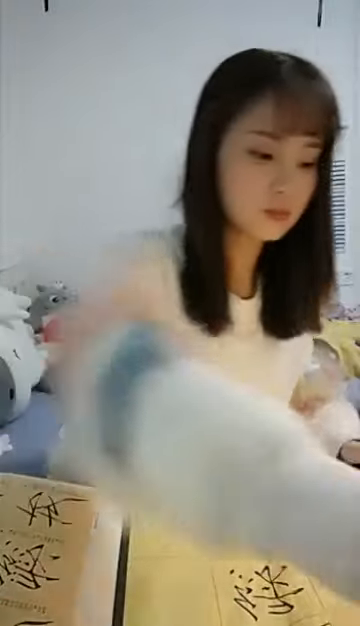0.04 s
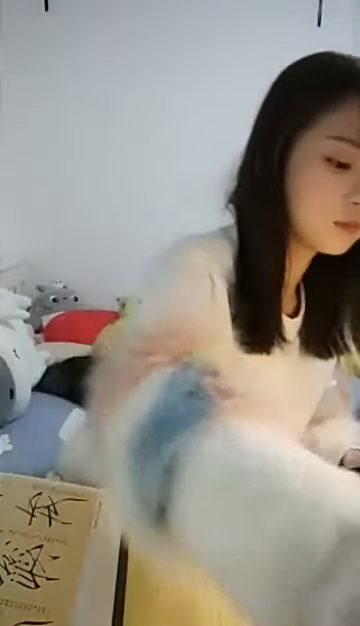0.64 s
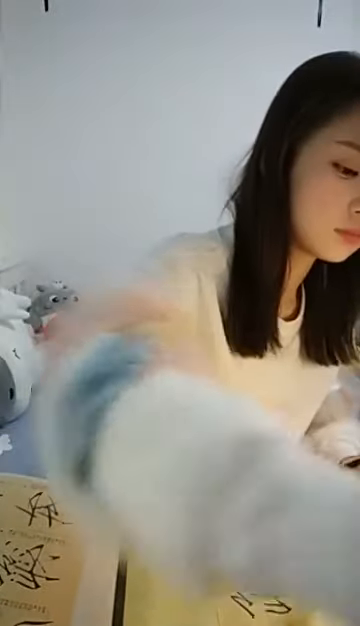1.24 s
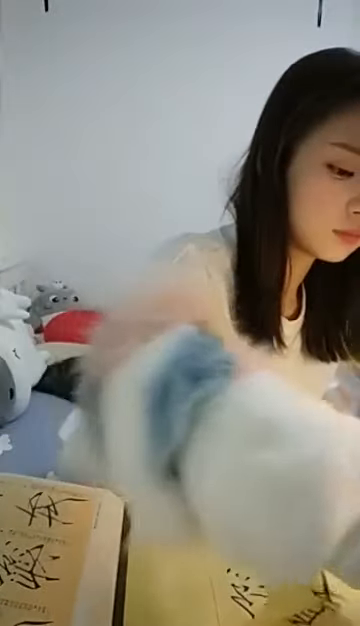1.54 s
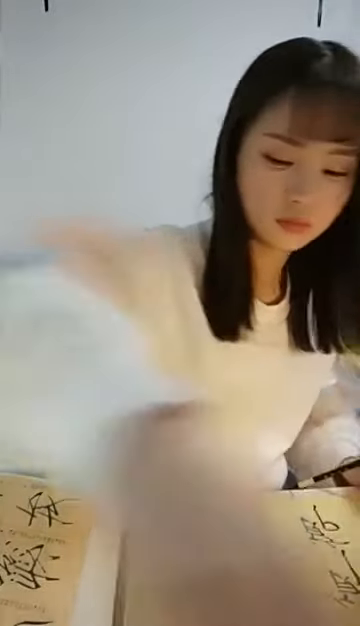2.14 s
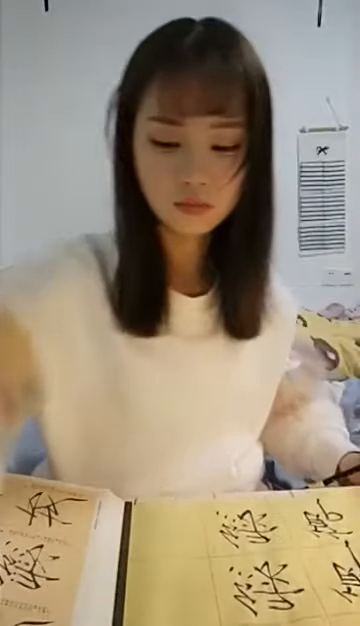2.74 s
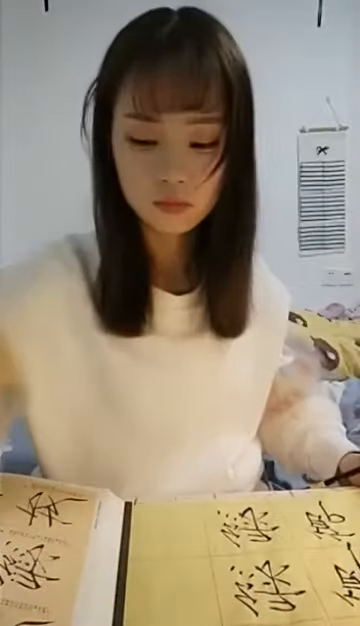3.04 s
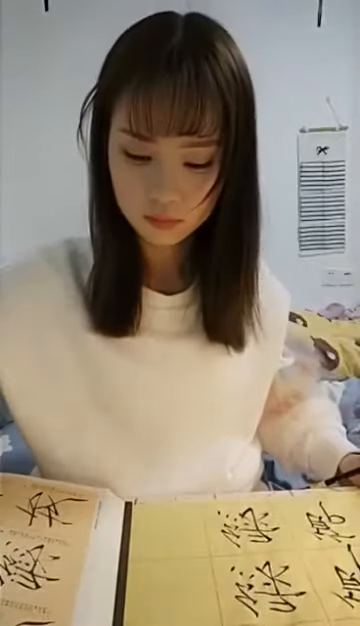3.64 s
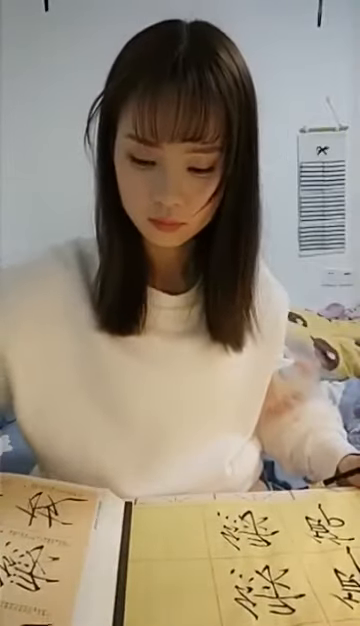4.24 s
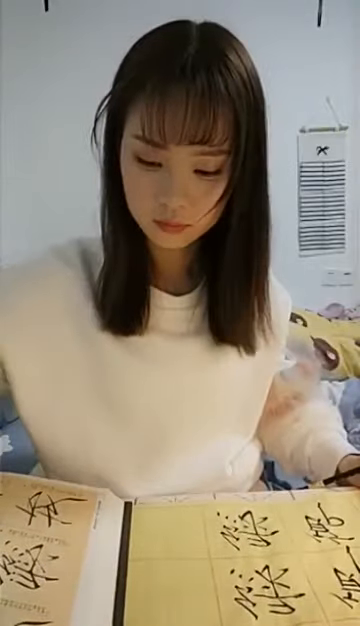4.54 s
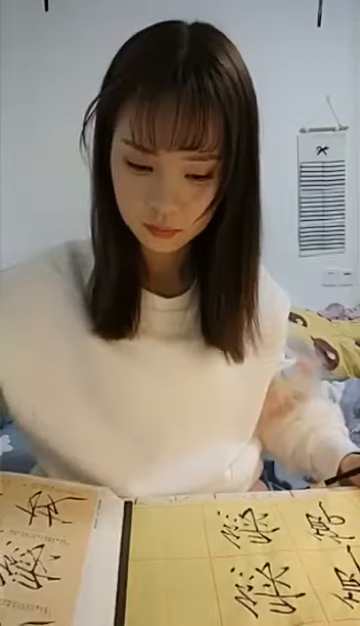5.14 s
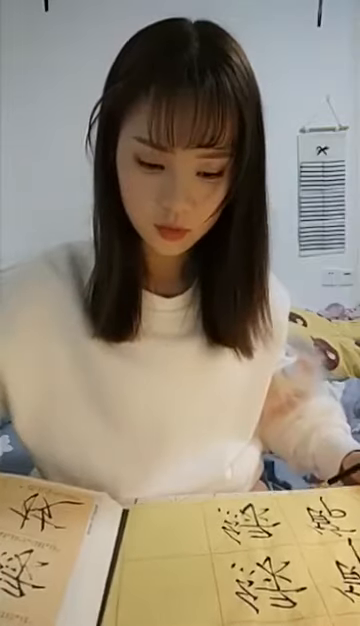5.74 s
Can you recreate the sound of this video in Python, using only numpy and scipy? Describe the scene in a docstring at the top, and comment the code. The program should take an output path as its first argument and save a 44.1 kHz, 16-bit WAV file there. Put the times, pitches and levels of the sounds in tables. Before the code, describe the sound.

A sheet of paper rustles and crackles close by as it is moved, then fingers softly stroke a page.

```python
"""A small quiet room, a phone microphone close to a paper practice book on a table.
A thin sheet is dragged, shifted and laid flat: it buckles in short snaps, each a burst of tiny
fibre cracks, crinkles as it slides and now and then pats the pages below. Later, fingers stroke
the page softly. Under it lie the low murmur of the room's air, a faint hum and a thin hiss."""
import sys
import numpy as np
from scipy import signal
from scipy.fft import rfft, irfft, next_fast_len
from scipy.io import wavfile
from scipy.ndimage import uniform_filter1d

SR = 44100
rng = np.random.default_rng(int(sys.argv[2]) if len(sys.argv) > 2 else 0)


def wav_out(sig):
    """Save sig, one row per channel (or a flat mono array), as 16-bit PCM at SR to the path in sys.argv[1]."""
    wavfile.write(sys.argv[1], SR, np.round(np.clip(np.atleast_2d(sig).T, -1, 1) * 32767).astype(np.int16))


N = 254898
TIME = np.arange(N) / SR

# the sheet's clear buckles: (time [s], level [dB], rise [s], body lift [dB], edge fizz lift [dB])
BUCKLES = [(0.2336, -59.5, 0.015, 5.5, 2), (0.4936, -54.5, 0.0081, 2, -1), (0.5446, -52, .0064, -5, 11),
           (0.5701, -36, 0.0032, -2, 5), (0.5987, -31, 0.0083, 0, 8.5), (0.633, -39.5, 0.0031, 1, 1),
           (0.6637, -47.5, 0.014, 6, -3), (0.7226, -38, 0.0069, 1, -1), (0.7402, -33.5, 0.0058, -7, 3),
           (0.762, -38.5, 0.0086, 4, -14), (0.801, -36, 0.0041, -5, -4), (0.842, -43, .008, 9, 10),
           (0.9034, -28.5, 0.0048, -5.5, 5), (1.008, -30, 0.0052, -4, 0), (1.05, -34.5, 0.004, -23, 7),
           (1.0674, -36, 0.0067, -10, 4), (1.101, -32, 0.0038, 4.5, 2), (1.106, -29, 0.0069, -9, 6.5),
           (1.117, -26.5, 0.0052, -9, 9), (1.1305, -27.5, 0.0089, -13.5, 0), (1.1583, -26, 0.0043, -8, 12),
           (1.1733, -37, 0.011, -24, 6), (1.214, -33.5, 0.0095, 0, 4), (1.3182, -50.5, 0.0057, 8, 4),
           (1.3998, -40.5, 0.0025, 1, 11.5), (1.4117, -46, 0.0078, 13, 9), (1.453, -31, 0.0039, -4, 13.5),
           (1.4608, -45.5, .008, 2, 7), (1.5501, -37.5, 0.0051, -23, 12), (1.5627, -39, 0.0095, -10, -14),
           (1.62, -46, 0.0043, 16, 6), (1.85, -56, 0.0031, 8, 4), (1.8805, -53, 0.0068, 17, -2),
           (1.9964, -60.5, 0.0089, 27, 5), (2.087, -55, 0.0064, 7, 2), (2.1603, -40, 0.0034, -6, 5),
           (2.185, -48, 0.0095, 1.5, 13), (2.2373, -51.5, 0.0053, 9, -6), (2.341, -54, 0.0032, 10, -12),
           (2.3782, -52, 0.005, -2, -17), (2.409, -38, 0.0052, -6.5, 2), (2.4838, -41.5, 0.0036, 0, 3),
           (2.504, -41.5, .007, 2.5, 3), (2.5381, -31, 0.0036, -9, 6), (2.5676, -33.5, .0044, -10, 8.5),
           (2.609, -38.5, 0.0057, -6.5, -8), (2.663, -49, 0.0056, -1, -7), (2.7013, -36.5, 0.0038, -1, 6),
           (2.7068, -32.5, 0.0074, -10, 5), (2.755, -41.5, 0.0056, 0, 0), (2.7731, -30, 0.0037, -10.5, -3),
           (2.7937, -33, .0032, -11, -3), (2.8212, -32, 0.0054, -3.5, 1), (2.85, -46.5, 0.0072, -1, -8),
           (2.8942, -48, 0.0094, 5, 8), (2.955, -43, .0034, -3, 8), (2.9717, -38.5, 0.0053, 2.5, -16),
           (3.072, -42, 0.0055, 6, 5), (3.1553, -40, 0.0025, -4, -19), (3.23, -45.5, 0.0041, 0.5, 3),
           (3.327, -46.5, 0.0047, -4, 5.5), (4.409, -51.5, 0.0067, 8, 15.5),
           (5.473, -50.5, 0.0078, -13, -1), (5.6437, -45, 0.0054, -1, -11), (5.6891, -47, .0055, -1, 8),
           (5.711, -46, .012, -3, 17), (5.744, -48.5, .0066, -6, -2)]
# spectrum of bending paper: (frequency [Hz], level [dB])
FLEX_SPECTRUM = [(40, -22), (130, -28), (280, -2), (750, -1.5), (1100, -1.5), (1700, 1.5), (3000, 2),
                 (4500, 0.5), (6000, 0), (9000, -11)]


def gain_of(db):
    """Decibels to gain."""
    return 10 ** (np.asarray(db) / 20)


def unit_rms(x):
    """Scales to rms 1."""
    return x / np.sqrt(np.mean(x ** 2) + 1e-20)


def at_frequency(points, hz):
    """Reads a table on a log-frequency axis."""
    frequency, value = np.transpose(points)
    return np.interp(np.log(hz + 1), np.log(frequency + 1), value)


def add(mix, start_s, sound):
    """Adds a sound into the mix at start_s."""
    part = mix[max(round(start_s * SR), 0):][:len(sound)]
    part += sound[:len(part)]


def ring(x, spectrum, lift_db=lambda hz: 0, size=2048):
    """Colours x with a minimum-phase filter, so that clicks stay sharp."""
    hz = abs(np.fft.fftfreq(size, 1 / SR))
    log_gain = np.log(gain_of(at_frequency(spectrum, hz) + lift_db(hz)))
    response = np.exp(np.conj(signal.hilbert(log_gain)))
    return signal.oaconvolve(x, np.fft.ifft(response).real[:size // 2])


def wander(per_s):
    """A smooth random curve of rms 1 that changes about per_s times a second."""
    size = next_fast_len(N)
    hz = np.fft.rfftfreq(size, 1 / SR)
    slow = rfft(rng.standard_normal(size)) / (1 + (hz / per_s) ** 4)
    return unit_rms(irfft(slow, size)[:N])


def clumping(depth_db, per_s):
    """A flickering gain that gathers an even grain into clumps."""
    return unit_rms(gain_of(depth_db * wander(per_s)))


def room_tone(hiss_db=-73):
    """The air murmurs and hums, growing a little louder overall, under a thin steady hiss."""
    # spectra of the murmur and the hiss: (frequency [Hz], level [dB])
    murmur_spectrum = [(30, -32), (70, -31.5), (105, -20.5), (135, -13.5), (165, -4.5), (210, 2.5),
                       (280, -1.5), (340, 2.5), (430, -3.5), (510, 0), (620, -5), (900, -7), (1400, -16),
                       (3000, -25.5), (8000, -44)]
    hiss_spectrum = [(1000, -8.5), (3000, -5), (6500, -7), (9500, 2), (11000, -1), (13000, -4.5),
                     (15600, -7)]
    # faint wavering hums: (frequency [Hz], relative level [dB])
    hums = [(214, -10.5), (548, -19.5)]
    # slow swell of murmur and hums together: (time [s], level [dB])
    air_level = [(0.0, -71.5), (1.4, -69), (1.68, -65), (2.2, -70), (2.8, -67.5), (4.7, -66.5), (5.78, -65)]
    murmur = unit_rms(ring(rng.standard_normal(N), murmur_spectrum, size=8192)[:N])
    hum = np.zeros(N)
    for hz, db in hums:
        waver = wander(per_s=13) + 1j * wander(per_s=6.5)
        hum += gain_of(db) * unit_rms((waver * np.exp(2j * np.pi * hz * TIME)).real)
    hiss = unit_rms(ring(rng.standard_normal(N), hiss_spectrum)[:N])
    swell = gain_of(np.interp(TIME, *np.transpose(air_level)))
    return swell * (gain_of(-1) * murmur + hum) + gain_of(hiss_db) * hiss


def small_room(x, wet_db=-15, echoes_per_s=3000, gap_s=0.005):
    """This close, the walls add only a short, weak tail of reflections; the treble dies first."""
    # reverberation of the room: (frequency [Hz], time to fall 60 dB [s])
    room_t60 = [(200, 0.16), (1500, 0.15), (5000, 0.097), (15000, 0.022)]
    echoes = rng.choice([-1., 1.], SR // 2) * (rng.random(SR // 2) < echoes_per_s / SR)
    echoes[:round(gap_s * SR)] = 0
    hz, t, bands = signal.stft(echoes, SR, nperseg=256)
    decay = gain_of(-60 * t / at_frequency(room_t60, hz)[:, None])
    tail = signal.istft(bands * decay, SR, nperseg=256)[1]
    return x + gain_of(wet_db) * signal.fftconvolve(x, tail / np.linalg.norm(tail))[:N]


def page_pats(step_octaves=0.67, attack_s=0.00021):
    """The page lands on those below: a dull, quickly fading puff in one broad resonance."""
    # soft landings: (time [s], level [dB], resonance [Hz], decay time [s])
    pats = [(1.094, -47, 1760, .015), (1.883, -60.5, 1670, 0.023), (3.076, -46.5, 1570, 0.008),
            (5.137, -60, 860, 0.024)]
    out, t = np.zeros(N), np.arange(SR // 8) / SR
    for start, db, hz, decay_s in pats:
        resonance = [(hz * 2 ** (k * step_octaves), -7 * abs(k) ** 1.5) for k in range(-3, 4)]
        puff = unit_rms(ring(rng.standard_normal(len(t)), resonance)[:len(t)])
        envelope = np.exp(-t / decay_s) * (1 - np.exp(-t / attack_s))
        add(out, start, gain_of(db) * envelope * puff)
    return out


def fibre_cracks(per_s, spread_db):
    """Paper fibres give way in a random train of clicks: mostly small, a few large."""
    cracked = rng.random(N) < per_s / SR
    size = np.minimum(rng.exponential(1, N), 5)
    sign = rng.choice([-1, 1], N)
    return unit_rms(cracked * sign * gain_of(spread_db * size))


def crinkle(spectrum, per_s, spread_db, ripple_db, strain_db, patches=8, strain_step_s=0.012):
    """Patches of the sheet crack as strain moves among them, each with its own uneven resonances."""
    grid_hz, out = np.linspace(0, SR / 2, num=70), np.zeros(N)
    ripples = ripple_db * rng.standard_normal((patches, len(grid_hz)))
    ripples -= 10 * np.log10(np.mean(gain_of(ripples) ** 2, axis=0))  # together they even out
    cracks = fibre_cracks(per_s, spread_db)
    patch_of_crack = rng.integers(0, patches, N)
    moments = np.arange(0, N / SR + strain_step_s, strain_step_s)
    for patch, ripple in enumerate(ripples):
        strain = gain_of(strain_db * np.interp(TIME, moments, rng.standard_normal(len(moments))))
        own_cracks = cracks * (patch_of_crack == patch) * strain
        out += ring(own_cracks, spectrum, lambda hz: np.interp(hz, grid_hz, ripple))[:N]
    return unit_rms(out)


def finger_strokes(attack_s=0.018, release_s=0.012):
    """Skin rubs paper with a fine, bright grain; each stroke lands, swells or eases, and lifts off."""
    # strokes on the page: (start [s], length [s], level [dB], swell [dB], flex offset [dB])
    strokes = [(4.178, 0.033, -71, -4, -11), (4.247, 0.22, -64, 6, -12.5), (4.527, 0.026, -68.5, -0.5, -16),
               (4.758, 0.06, -67.5, -2, -12), (4.83, 0.017, -58.5, -2, -22), (5.115, 0.028, -61.5, 8, -8),
               (5.157, 0.21, -68, -9, -6), (5.362, 0.094, -53, -8, -17), (5.468, 0.074, -46.5, -14.5, -10),
               (5.543, 0.088, -58, 6.5, -13.5), (5.633, 0.14, -51.5, 1.5, -8)]
    # spectrum of skin on paper: (frequency [Hz], level [dB])
    skin_spectrum = [(2000, -46), (5000, -27), (6800, -3.5), (9200, 4.5), (11500, 5.5), (13500, 0.5),
                     (15600, 0.5)]
    clumps = clumping(depth_db=1, per_s=200)
    friction = crinkle(skin_spectrum, per_s=27000, spread_db=4, ripple_db=4, strain_db=-1.5)
    flex = crinkle(FLEX_SPECTRUM, per_s=12000, spread_db=3.5, ripple_db=0.5, strain_db=2.5)
    out = np.zeros(N)
    for start, length, db, swell_db, flex_db in strokes:
        t = TIME - start
        contact = np.clip(t / attack_s, 0, 1) * np.exp(-np.maximum(t - length, 0) / release_s)
        effort = gain_of(db + swell_db * np.clip(t / length, 0, 1))
        out += contact * effort * (gain_of(2) * friction + gain_of(flex_db) * flex)
    return clumps * out


def sheet_motion():
    """How fast the sheet slides, as a gain on its friction; silent before and after the handling."""
    # dragged across the book, shifted once more, laid down and pressed flat: (time [s], level [dB])
    drag = [(0.46, -71), (0.6, -47.5), (0.7, -48.5), (0.77, -46), (0.89, -48.5), (1.07, -43.5), (1.15, -41),
            (1.21, -43), (1.32, -64)]
    shift = [(1.44, -57.5), (1.5, -51.5), (1.59, -52.5), (1.65, -68.5), (1.71, -67.5), (2.06, -74.5),
             (2.23, -64), (2.3, -79)]
    lay_down = [(2.41, -62.5), (2.47, -81), (2.58, -51), (2.66, -65.5), (2.78, -59), (3.1, -62),
                (3.22, -75), (3.4, -67), (3.55, -88)]
    db = np.interp(TIME, *np.transpose(drag + shift + lay_down), left=-120, right=-120)
    return uniform_filter1d(gain_of(db), size=300)


def sheet_settling(offset_db=-18.5, fade_db_per_s=227):
    """Gain of the rustle as the sheet settles after each clear buckle."""
    power, t = np.zeros(N), np.arange(SR // 2) / SR
    for start, db, rise_s, _, _ in BUCKLES:
        add(power, start + rise_s, gain_of(db + offset_db - fade_db_per_s * t) ** 2)
    return np.sqrt(power)


def sheet_sliding(friction_db=-1, flex_db=-5, flex_limit_db=-50.5):
    """Dense cracks in clumps: the same catches make the sheet hiss and flex as it moves and settles."""
    # spectrum of paper sliding on paper: (frequency [Hz], level [dB])
    friction_spectrum = [(1500, -30.5), (4000, -15), (5900, -5.5), (6900, -3), (9000, 3.5), (11200, 1.5),
                         (12700, -3.5), (15600, -8.5)]
    clumps = clumping(depth_db=1.73, per_s=92)
    friction = crinkle(friction_spectrum, per_s=20000, spread_db=2.5, ripple_db=2, strain_db=5.5)
    flex = crinkle(FLEX_SPECTRUM, per_s=10000, spread_db=2.5, ripple_db=6, strain_db=3.5)
    flex *= clumping(depth_db=1, per_s=63)
    moving = np.hypot(sheet_motion(), sheet_settling())
    bending = gain_of(flex_db) * moving
    bending /= np.hypot(1, bending / gain_of(flex_limit_db))  # the sheet can bend only so far
    return clumps * (gain_of(friction_db) * moving * friction + bending * flex)


def stray_buckles(count=30, from_s=0.55, to_s=3.8, spread_db=3, rise_s=0.0023, body_db=4, fizz_db=0):
    """Rows like BUCKLES for small ticks at random moments, stronger when the sheet moves faster."""
    when, strength = rng.random((count, 2)).T
    times = from_s + when * (to_s - from_s)
    motion_db = 20 * np.log10(np.interp(times, TIME, sheet_motion()))
    levels = motion_db + 1.5 + spread_db * (2 * strength - 1)
    return [(start, db, rise_s, body_db, fizz_db) for start, db in zip(times, levels)]


def sheet_snaps(buckles, ripple_db=3, pop=3.3, body_hz=3200, crease_hz=5200, edge_hz=12200):
    """Each buckle is an avalanche of cracks that swells to one sharp pop, ringing its own patch."""
    out, cracks = np.zeros(N), fibre_cracks(per_s=14000, spread_db=3)
    grid_hz = np.linspace(0, SR / 2, num=44)
    ripples = ripple_db * rng.standard_normal((len(buckles), len(grid_hz)))
    for (start, db, rise_s, body_db, fizz_db), ripple in zip(buckles, ripples):
        peak = max(round(rise_s * SR), 20)
        age = np.arange(5 * peak) / peak  # in rise times
        swell = (age * np.exp(1 - age)) ** 3
        avalanche = swell * cracks.take(int(start * SR) + np.arange(len(age)), mode="wrap")
        avalanche[peak] = pop

        def lift_db(hz):
            """Broad flexing is dark and brings the crease with it; the free edge fizzes."""
            body = body_db / (1 + (hz / body_hz) ** 8) * hz / (hz + 400)
            crease = 0.39 * body_db * np.exp(-((hz - crease_hz) / 1800) ** 4)
            fizz = fizz_db * (1 - 1 / (1 + (hz / edge_hz) ** 20))
            return body + crease + fizz + np.interp(hz, grid_hz, ripple)

        # spectrum of a snap, heard close: (frequency [Hz], level [dB])
        snap_spectrum = [(40, -50), (130, -34.5), (250, -17), (500, -22.5), (1000, -20), (1700, -10),
                         (4500, -8), (6000, -4.5), (6900, -6.5), (8000, -3), (9500, 1), (11200, -1.5),
                         (12600, -10.5), (15600, -14)]
        burst = ring(avalanche, snap_spectrum, lift_db)
        add(out, start, gain_of(db) * burst * np.linalg.norm(swell) / np.linalg.norm(burst))
    return out


def scene():
    """The paper close up, over the room tone; one microphone feeds both channels."""
    paper = sheet_snaps(BUCKLES + stray_buckles()) + page_pats() + sheet_sliding() + finger_strokes()
    sound = small_room(paper) + room_tone()
    return np.array([sound, sound])


def record(dry):
    """The phone cuts the treble above 15750 Hz."""
    lowpass = signal.firwin(401, 15750, window=("kaiser", 8), fs=SR)
    return signal.oaconvolve(dry, lowpass[None], "same")


dry = scene()
out = record(dry)
wav_out(out)
```